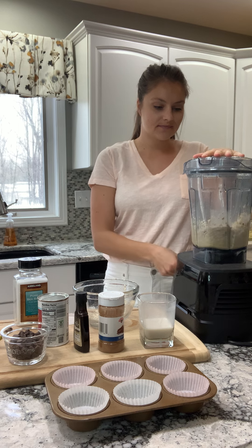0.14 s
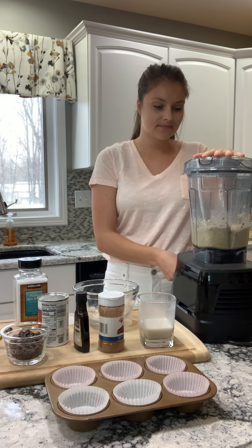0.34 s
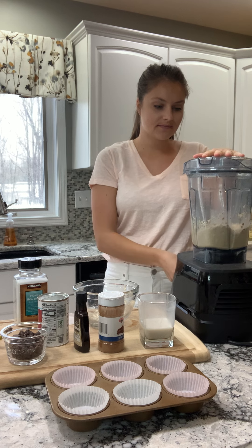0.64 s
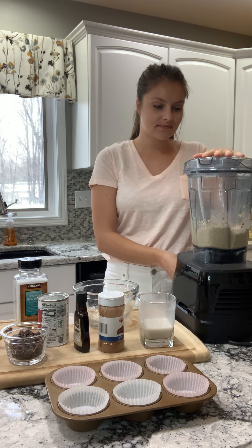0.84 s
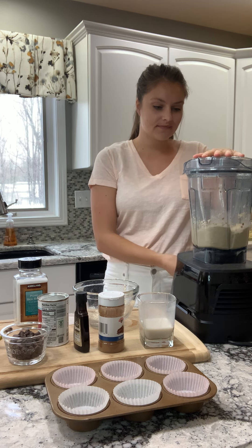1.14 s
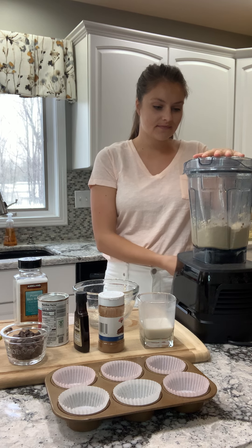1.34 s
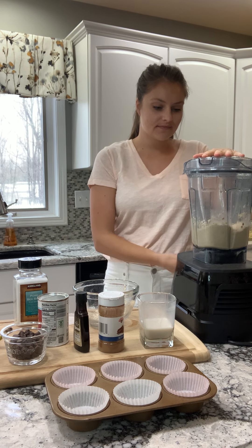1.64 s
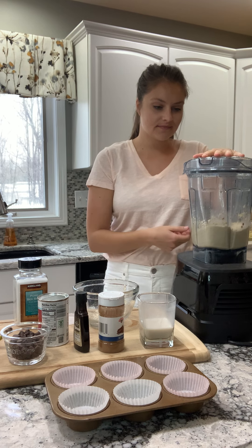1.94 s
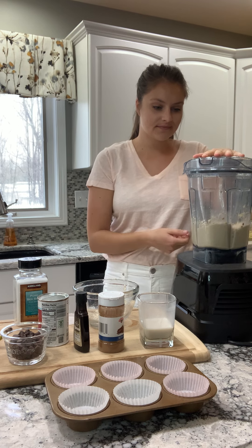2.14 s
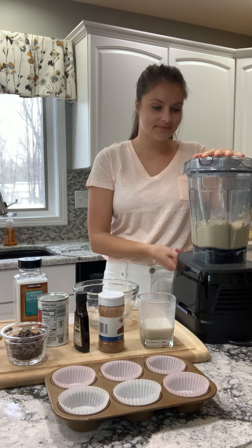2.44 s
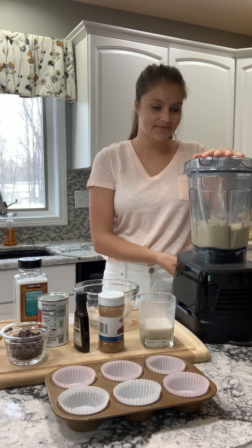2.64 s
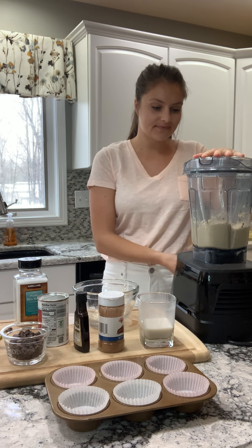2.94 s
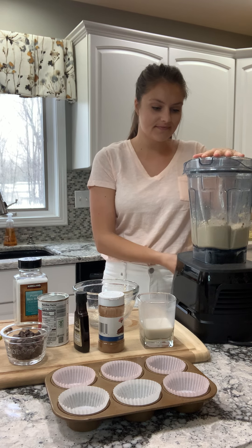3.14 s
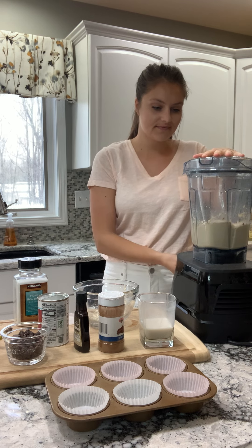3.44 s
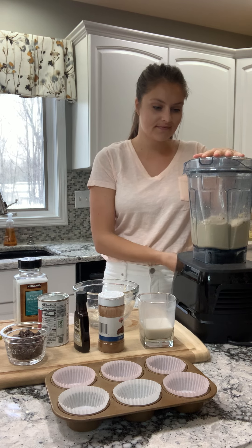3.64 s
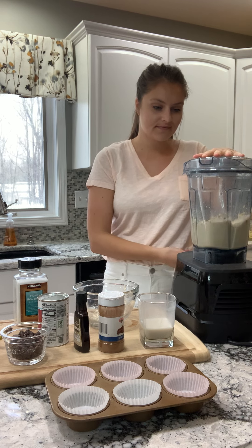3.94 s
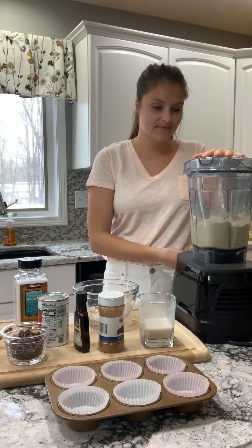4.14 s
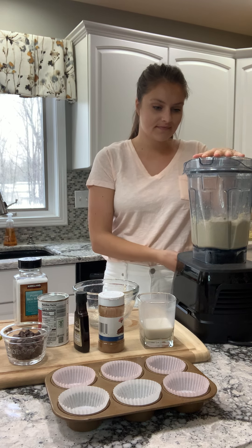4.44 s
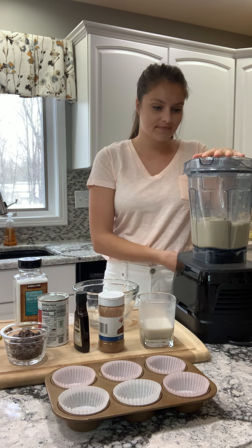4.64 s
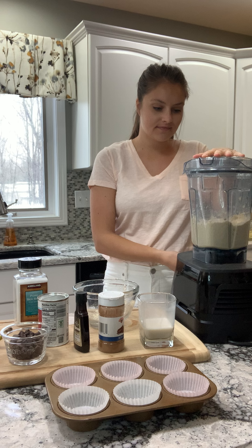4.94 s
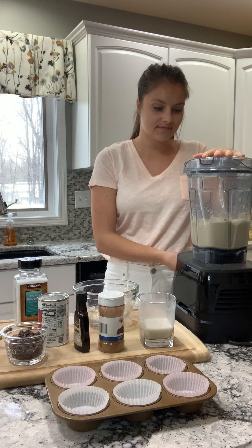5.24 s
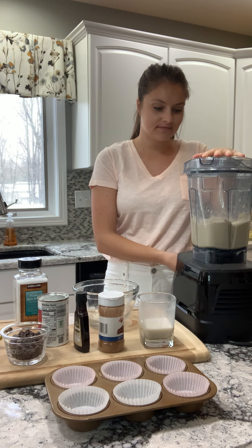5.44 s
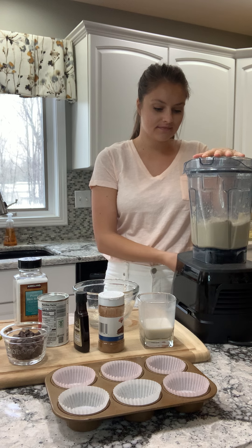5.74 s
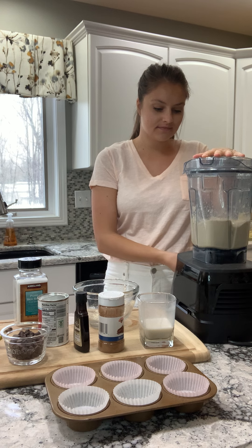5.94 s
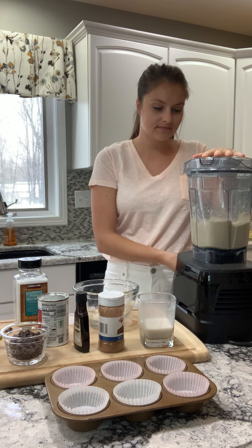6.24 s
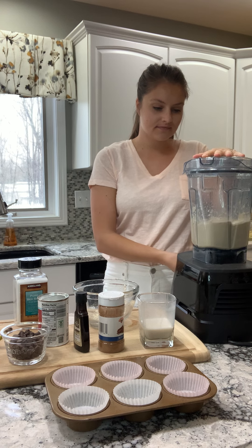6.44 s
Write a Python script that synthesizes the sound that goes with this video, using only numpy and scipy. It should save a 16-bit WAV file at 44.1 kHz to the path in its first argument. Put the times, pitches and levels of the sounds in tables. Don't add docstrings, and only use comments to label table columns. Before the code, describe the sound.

Close in a reflective kitchen, a blender idles slowly with a quiet electrical hum for about a second, then steps up to medium, batter thudding and lumps knocking in the jar. It throbs steadily, dips for a moment, then rises quickly into a loud, steady roar with a low droning tone, rough churning and bright motor hiss lasting to the end. Stereo microphone about a step away.

```python
import sys
import numpy as np
from scipy import signal
from scipy.fft import rfft, irfft, next_fast_len
from scipy.io import wavfile

SR = 44100
rng = np.random.default_rng(int(sys.argv[2]) if len(sys.argv) > 2 else 0)


def transcribe(signal):
    frames = np.atleast_2d(signal).T
    limited = np.clip(frames, -1, 1)
    pcm = np.round(limited * 32767).astype(np.int16)
    wavfile.write(sys.argv[1], SR, pcm)


def ratio_of_db(decibels):
    return 10 ** (np.asarray(decibels, float) / 20)


N = 291039
T_S = np.arange(N) / SR
SIZE = next_fast_len(N + SR)
HZ = np.maximum(np.arange(SIZE // 2 + 1) * SR / SIZE, 1)
MAINS_PULSE_HZ = 120

# t/s, speed/(turns/s), base rocking level/dB
SHAFT = [(0, 30, -31), (0.98, 30, -6), (1.2, 62, -8), (1.42, 72, -14), (1.5, 82, -9.5), (1.6, 87, -13),
         (1.65, 89, -4.5), (2.18, 88.2, -4), (2.27, 88.4, 0), (2.45, 88.3, -3.5), (3.03, 88.5, -6),
         (3.07, 88.5, -20), (3.28, 90.5, -20), (3.35, 95, -15), (3.41, 120, 0), (3.5, 144.5, 0),
         (3.6, 161.5, 0), (3.69, 166, 0.5), (3.9, 163.7, 1.7), (6.6, 163.8, 1.6)]
# t/s, 120 Hz level/dB, 240 Hz level/dB, 360 Hz level/dB
HUM = [(0, -50, -37, -37), (0.24, -57, -39, -37), (0.4, -49, -39.5, -37.5), (0.5, -53, -39, -37),
       (0.65, -50, -43.5, -36.5), (0.74, -62, -58, -41), (0.9, -52, -51, -37), (1.27, -50, -42, -35.5),
       (1.33, -58, -49, -35), (1.45, -60, -44, -35.5), (1.6, -55, -46, -42.5), (2.15, -61, -48, -41),
       (2.4, -58, -47, -41.5), (3.05, -57, -57, -40.5), (3.35, -58, -43, -37), (3.6, -64, -53, -49),
       (6.6, -76, -46.5, -49)]
# t/s, level/dB
EFFORT = [(0, -42.5), (0.45, -42.5), (0.88, -44), (1.0, -42), (1.12, -37), (1.3, -33.5), (1.65, -31),
          (2.95, -33), (3.06, -34.5), (3.2, -33), (3.4, -28.5), (3.5, -29), (3.63, -24), (3.9, -25.5),
          (6.6, -26.5)]
# t/s, cover/(0-1)
COVER = [
    (0, 0.1),
    (1.0, 0.16),
    (1.3, 0.75),
    (1.7, 0.96),
    (3.1, 0.66),
    (3.4, 0.63),
    (3.6, 0.12),
    (6.6, 0),
]
# t/s, length/s, churn swell/dB, jar swell/dB
GULPS = [(1.116, 0.12, 2, -2.5), (1.208, 0.0071, 7, 2), (1.278, 0.014, 5.5, -2), (1.39, 0.0057, 11, 1),
         (1.492, 0.014, 5, 5.5), (1.542, 0.028, -2, 1), (2.004, 0.019, 0.5, 1.5), (2.253, 0.02, 1.5, 1.5),
         (3.378, 0.02, -3.5, -0.5), (3.445, 0.023, -10, 0), (3.647, 0.011, 7, -2), (4.371, 0.019, 2, 2),
         (4.435, .03, 4, -2.5), (4.723, 0.049, 3.5, -1.5), (5.048, 0.038, 3, 2.5), (5.401, 0.015, 5, 2),
         (5.653, 0.015, 6, 3.5), (5.95, 0.02, 7, -1), (6.35, 0.13, -1, 1.5), (6.58, 0.013, -10, 4)]
# t/s, level/dB
FEET = [(0, -85), (1.15, -75), (1.3, -54), (1.67, -57), (1.72, -47), (1.9, -44.5), (2.19, -48),
        (2.32, -41.5), (2.6, -49.5), (2.72, -51), (2.82, -47), (3.1, -49), (3.15, -57), (3.22, -52),
        (3.36, -52), (3.41, -75), (6.6, -83)]
# t/s, peak level/dB, ring f/Hz
LUMPS = [
    (1.21, -18, 600),
    (1.274, -12, 480),
    (1.391, -14, 478),
    (1.49, -20, 650),
    (1.545, -14, 500),
    (1.697, -16, 500),
    (3.241, -18, 450),
    (3.644, -18, 600),
]

# multiple of mains pulse, level re third/dB
UPPER_HUM = [
    (4, -13.5),
    (6, -10),
    (7, -21),
    (9, -17.5),
]
# mains multiple added to turn rate, level re unbalance tone/dB
BEATS = [
    (1, -23),
    (2, -27.5),
    (3, -20),
]
# f/Hz, level/dB
BASE = [(60, -46), (90, -43), (120, -21), (150, -0.5), (164, -0.4), (180, 0), (200, -13), (330, -11)]
KNOCK_MULTIPLES = [1.5, 2, 3, 3.5, 4, 4.5, 4.73, 5, 8, 12, 17]
# level re low churn/dB, one per multiple
KNOCK_LEVELS = [-16.5, -13.5, -7.5, -6.5, -3.5, -9, -16.5, -7.5, -18, -20, -26]

# f/Hz, level/(dB per Hz)
SLOSH = [(25, -52), (50, -44), (100, -65), (140, -11.5), (200, -9), (270, -6.5), (450, -3), (600, 0.5),
         (800, -4.5), (1000, -9), (1400, -34), (15500, -49)]
JAR = [(600, -54), (900, -3.5), (1050, -2.5), (1200, 3), (1450, 1.1), (1650, -7), (2000, -12),
       (2600, -25.5), (13500, -23), (15700, -27)]
AIR = [(1400, -14), (1900, -2.5), (2200, 1.5), (2600, -3), (2900, -4), (3600, -8.5), (6000, -62)]
BRUSHES = [(3600, -30), (4250, -0.5), (4800, -2), (5200, 2), (5600, 3.5), (6500, 1), (7000, -5), (8000, -3),
           (9500, -4.5), (11200, -10), (12000, -32), (13000, -50)]
RUMBLE = [(30, -7), (52, 0.5), (85, -4), (120, -23), (165, 6), (220, -5), (400, -53)]
VENT = [(8500, -10), (10000, -2.5), (11300, 4), (11600, 4), (11850, -8), (14000, -9), (15000, -8),
        (15600, -20)]
BLADE_HISS = [(2500, -25), (3000, -2), (3400, 0), (3900, 1), (4200, -3), (4700, -25), (9000, -50)]

# f/Hz, width/Hz, level/dB
BODY = [(560, 56, 0), (1290, 110, 1.5), (924, 33, 3), (1456, 44, 3), (1630, 45, 7), (1797, 70, 6),
        (1965, 38, 5.5), (2558, 89, 3.5), (2770, 220, 3), (6340, 26, 6), (6770, 38, 6.5), (7500, 120, -2.5),
        (9870, 180, -3.5)]
COVERED_RING = [(703, 31, 10), (1487, 100, 1.5), (572, 57, -8.5)]

# f/Hz, room re direct level/dB
WET = [(60, -30), (164, -24), (300, -17.5), (700, -2.5), (1500, -3.5), (2500, -3.5), (3400, -9.5),
       (4000, -11.5), (4800, -14), (7000, -11), (11000, -21), (12300, -15), (13500, -20), (14000, -8),
       (15000, -5)]
# f/Hz, left minus right level/dB
LEAN = [(60, -2.5), (164, -0.7), (230, -2.5), (400, -2), (2500, -2.5), (4000, 0.05), (15000, -0.5)]


def rms_one(x):
    return x / np.sqrt(np.mean(np.abs(x) ** 2) + 1e-20)


def in_time(rows):
    t_s, *columns = np.transpose(rows)
    return [np.interp(T_S, t_s, column) for column in columns]


def at_hz(points):
    hz, level_db = np.transpose(points)
    return ratio_of_db(np.interp(np.log(HZ), np.log(hz), level_db))


def drift(rate_per_s):
    r = np.exp(-80 * np.pi * rate_per_s / SR)
    white = rng.standard_normal(N // 40 + 2002)
    slow = signal.lfilter([1], [1, -2 * r, r * r], white)[2000:]
    return np.interp(np.arange(N) / 40, np.arange(len(slow)), rms_one(slow))


def tone(cycles):
    return np.sqrt(2) * np.sin(2 * np.pi * (cycles + rng.random()))


def resonance(hz, width_hz):
    return 1 / (1 + (2 * (HZ - hz) / width_hz) ** 2)


def housing():
    body = np.ones(len(HZ))
    for hz, width_hz, level_db in BODY:
        body *= 1 + (ratio_of_db(level_db) - 1) * resonance(hz, width_hz)
    return body * (HZ < 16500) * np.minimum(HZ / 42, 1) ** 3


def rush(spectrum, turns, body, per_turn, flicker_db, rate_per_s):
    swell = 1 + per_turn * tone(turns) / np.sqrt(2)
    noise = rng.standard_normal(N) * swell * ratio_of_db(flicker_db * drift(rate_per_s))
    return rms_one(irfft(rfft(noise, SIZE) * at_hz(spectrum) * body, SIZE)[:N])


def hum():
    pulses = MAINS_PULSE_HZ * T_S
    first_db, second_db, third_db = in_time(HUM)
    out = ratio_of_db(first_db + 1.0 * drift(4.8)) * tone(pulses)
    out += ratio_of_db(second_db + 1.1 * drift(1.4)) * tone(2 * pulses)
    out += ratio_of_db(third_db + 1.1 * drift(3.0)) * tone(3 * pulses)
    out += ratio_of_db(second_db - 3.5 + 2.0 * drift(3)) * tone(5 * pulses)
    for multiple, level_db in UPPER_HUM:
        out += ratio_of_db(third_db + level_db + 5.2 * drift(8.4)) * tone(multiple * pulses)
    return out


def base_db(hz):
    base_hz, level_db = np.transpose(BASE)
    return np.interp(np.log(hz), np.log(base_hz), level_db)


def shaft(turns, speed, rock_db):
    once_db = -22.5 + rock_db + base_db(0.94 * speed)
    twice_db = -31 + rock_db + base_db(2 * speed)
    shake = ratio_of_db(once_db + 0.5 * drift(5.8))
    out = shake * tone(turns) + ratio_of_db(twice_db + 0.5 * drift(14.0)) * tone(2 * turns)
    for multiple, level_db in BEATS:
        beat = tone(turns + multiple * MAINS_PULSE_HZ * T_S)
        out += shake * ratio_of_db(level_db + 2.0 * drift(11.0)) * beat
    return out


def slosh(turns, body, slosh_db):
    return ratio_of_db(slosh_db) * rush(SLOSH, turns, body, per_turn=0.14, flicker_db=0.8, rate_per_s=27.0)


def jar(turns, body, jar_db):
    return ratio_of_db(jar_db) * rush(JAR, turns, body, per_turn=0.06, flicker_db=1.0, rate_per_s=9.7)


def fan(turns, body, effort_db):
    level_db = -34.5 + 0.72 * effort_db
    return ratio_of_db(level_db) * rush(AIR, turns, body, per_turn=0.12, flicker_db=0.8, rate_per_s=9.4)


def brushes(turns, body, effort_db, draught_db):
    buzz = 1 + 0.03 * tone(MAINS_PULSE_HZ * T_S)
    level_db = -31.5 + 0.76 * effort_db + draught_db
    return buzz * ratio_of_db(level_db) * rush(BRUSHES, turns, body, per_turn=0.06, flicker_db=0.5, rate_per_s=11.0)


def vents(turns, body, effort_db, draught_db):
    level_db = -41.5 + 1.15 * effort_db + draught_db
    return ratio_of_db(level_db) * rush(VENT, turns, body, per_turn=0.1, flicker_db=0.2, rate_per_s=9.0)


def rumble(turns, body, effort_db):
    level_db = -54 - 0.2 * effort_db
    return ratio_of_db(level_db) * rush(RUMBLE, turns, body, per_turn=0.1, flicker_db=0.5, rate_per_s=6.0)


def blade_hiss(turns, body, effort_db, cover):
    level_db = -35.5 + 0.72 * effort_db - 12 * cover
    return ratio_of_db(level_db) * rush(BLADE_HISS, turns, body, per_turn=0.11, flicker_db=0.3, rate_per_s=15.0)


def knocks(turns, speed, slosh_db, cover):
    batter_turns = 0.996 * turns
    rough, wander_per_s = 0.36, 6
    out = np.zeros(N)
    for multiple, level_db in zip(KNOCK_MULTIPLES, KNOCK_LEVELS):
        wander = drift(wander_per_s) + 1j * drift(wander_per_s)
        wander = rms_one(1 - rough + rough * wander)
        spin = np.exp(2j * np.pi * multiple * batter_turns)
        out += ratio_of_db(level_db) * np.sqrt(2) * np.real(wander * spin)
    speed_db = 14 * np.log2(speed / speed[-1])
    return ratio_of_db(slosh_db - 1 + speed_db - 9.0 * cover) * out


def covered_ring(effort_db, cover):
    modes = sum(ratio_of_db(level_db) * resonance(hz, width_hz) for hz, width_hz, level_db in COVERED_RING)
    noise = rng.standard_normal(N) * ratio_of_db(0.8 * drift(10.0))
    ring = rms_one(irfft(rfft(noise, SIZE) * modes, SIZE)[:N])
    return ratio_of_db(-31 + 0.8 * effort_db) * cover * ring


def gulps():
    t_s, length_s, *swells_db = np.transpose(GULPS)
    coarse = np.arange(0, N, 40)
    bells = np.exp(-((coarse / SR - t_s[:, None]) / length_s[:, None]) ** 2)
    return [np.interp(np.arange(N), coarse, swell_db @ bells) for swell_db in swells_db]


def feet(turns):
    return ratio_of_db(in_time(FEET)[0] + 0.52 * drift(4.7)) * tone(turns)


def lumps():
    out = np.zeros(N + SR)
    s = np.arange(SR // 20) / SR
    for start_s, peak_db, hz in LUMPS:
        i = int(start_s * SR)
        decay = ratio_of_db(peak_db - 60 * s * hz / 11)
        attack = np.minimum(s * hz, 1)
        out[i:i + len(s)] += decay * np.sin(2 * np.pi * hz * s) * attack
    return out[:N]


def kitchen(x):
    t60_s, port_lag_samples = 0.36, 5.17
    s = np.arange(SR // 2) / SR
    tails = rng.standard_normal((2, len(s))) * ratio_of_db(-60 * s / t60_s) * (s > 0.003)
    tails /= np.sqrt(np.sum(tails ** 2, axis=1, keepdims=True))
    late = np.exp(-2j * np.pi * HZ * port_lag_samples / SR)
    heard = np.stack([late, np.ones(len(HZ))]) + at_hz(WET) * rfft(tails, SIZE)
    heard /= np.mean(np.abs(heard) ** 2, axis=0) ** 0.5
    lean = np.sqrt(at_hz(LEAN))
    heard *= np.stack([lean, 1 / lean])
    return irfft(rfft(x, SIZE) * heard, SIZE)[:, :N]


def scene():
    speed, rock_db = in_time(SHAFT)
    wobble = 0.004 * speed / speed[-1] * drift(12)
    turns = np.cumsum(speed * (1 + wobble)) / SR
    effort_db = in_time(EFFORT)[0] + 26.5
    cover = np.clip(in_time(COVER)[0], 0, 1)
    body = housing()
    slosh_gulp_db, jar_gulp_db = gulps()
    slosh_db = -27.5 + 0.62 * effort_db
    jar_db = -26 + 0.86 * effort_db
    draught_db = 0.5 * drift(8.1)

    blender = hum() + shaft(turns, speed, rock_db)
    blender += slosh(turns, body, slosh_db + slosh_gulp_db)
    blender += jar(turns, body, jar_db + jar_gulp_db)
    blender += fan(turns, body, effort_db)
    blender += brushes(turns, body, effort_db, draught_db)
    blender += vents(turns, body, effort_db, draught_db)
    blender += rumble(turns, body, effort_db)
    blender += blade_hiss(turns, body, effort_db, cover)
    blender += knocks(turns, speed, slosh_db, cover)
    blender += covered_ring(effort_db, cover)
    blender += feet(turns) + lumps()
    return kitchen(blender)


def low_pass(x):
    return signal.sosfilt(signal.butter(12, 15730, fs=SR, output="sos"), x)


def record(dry):
    return low_pass(dry)


dry = scene()
out = record(dry)
transcribe(out)
```